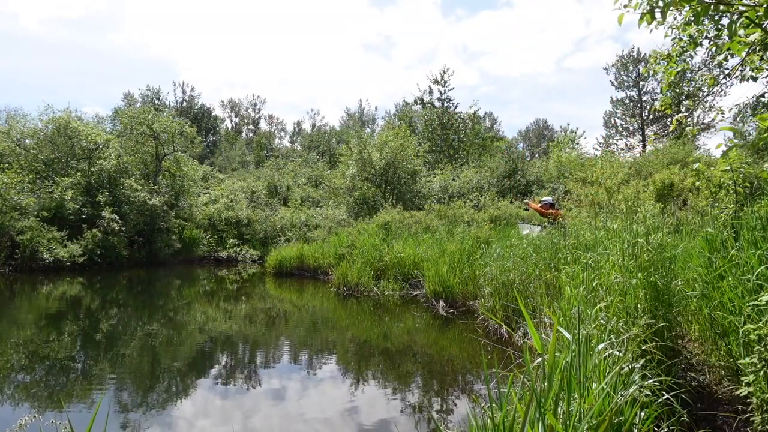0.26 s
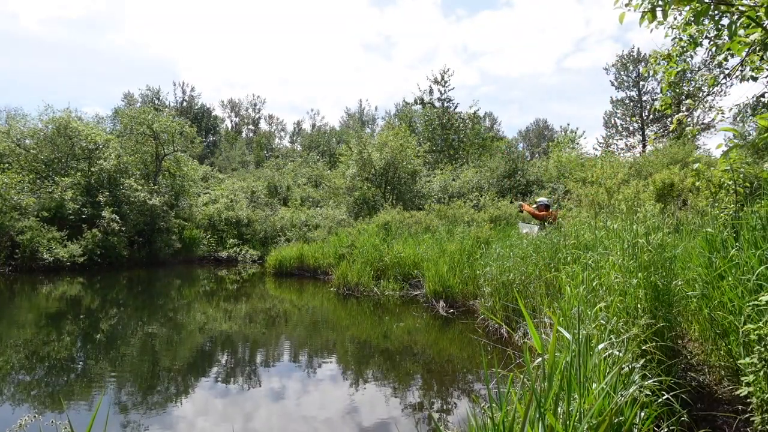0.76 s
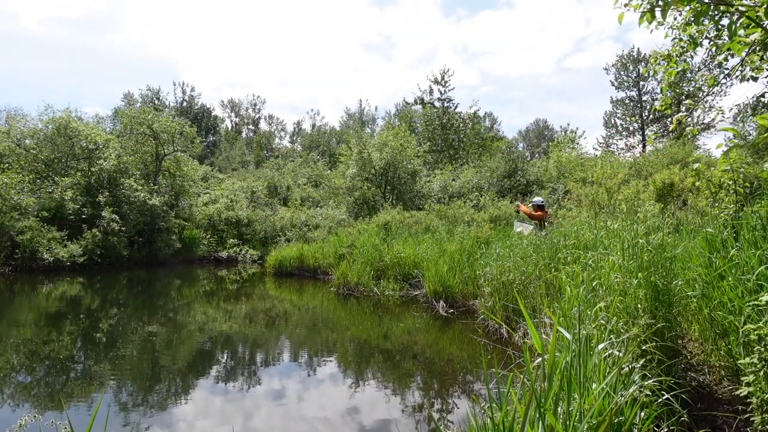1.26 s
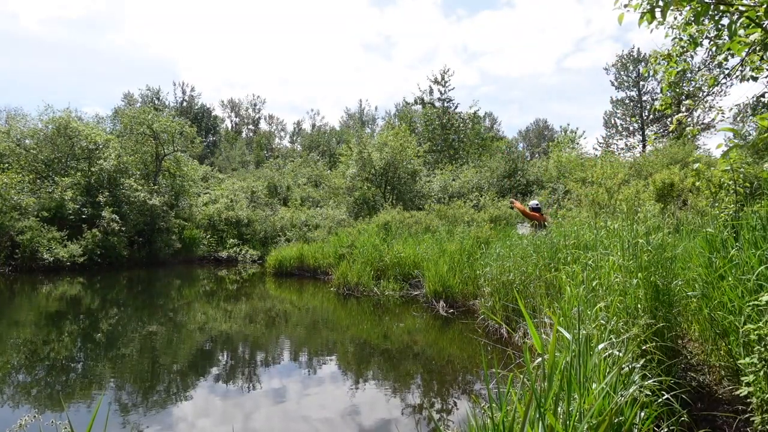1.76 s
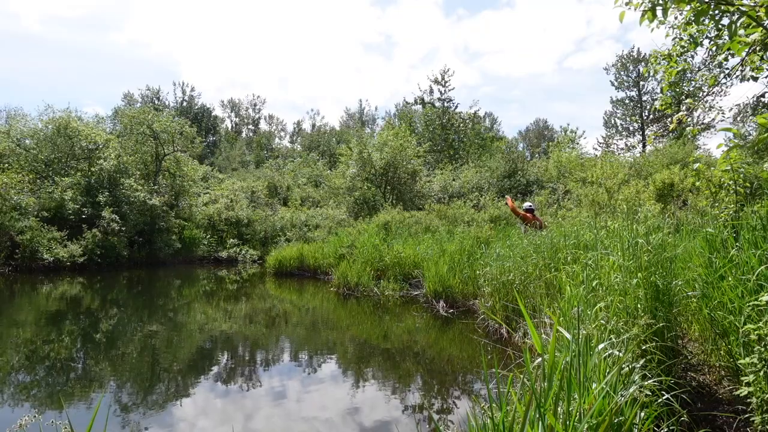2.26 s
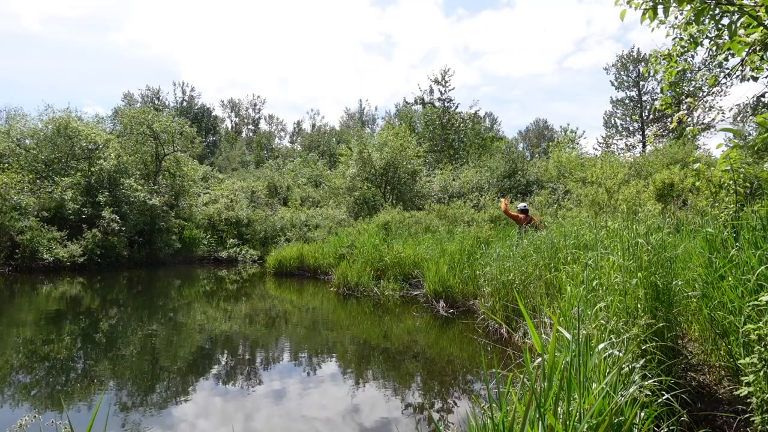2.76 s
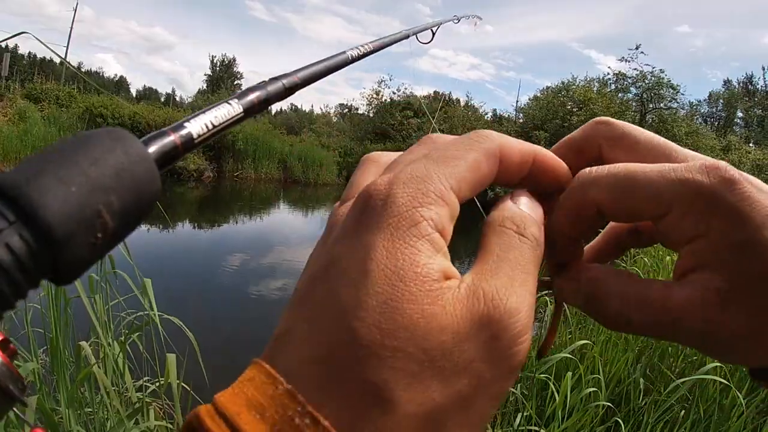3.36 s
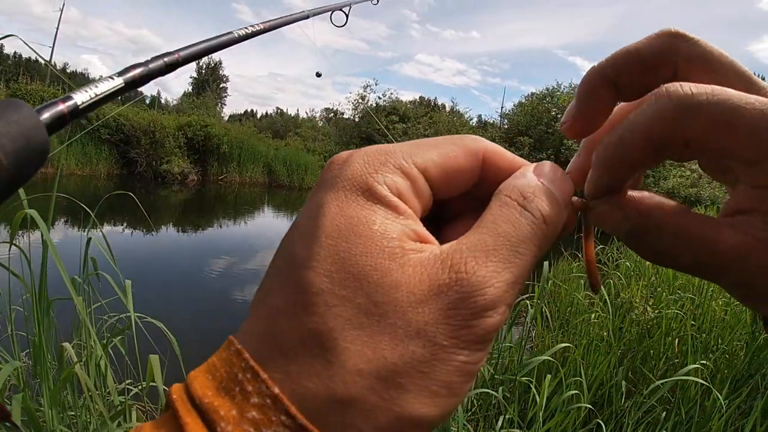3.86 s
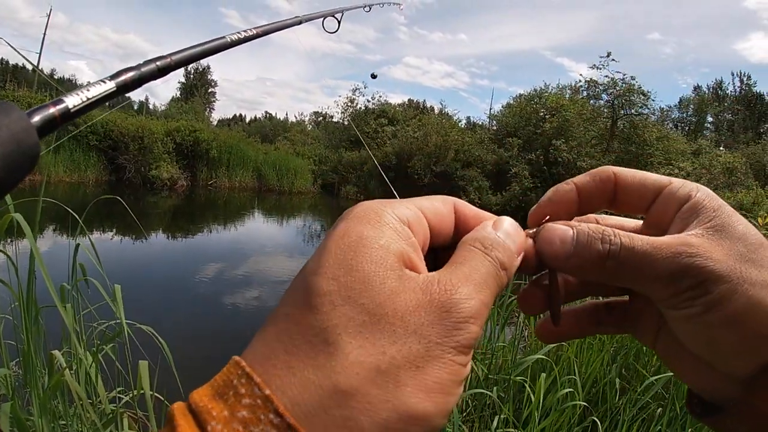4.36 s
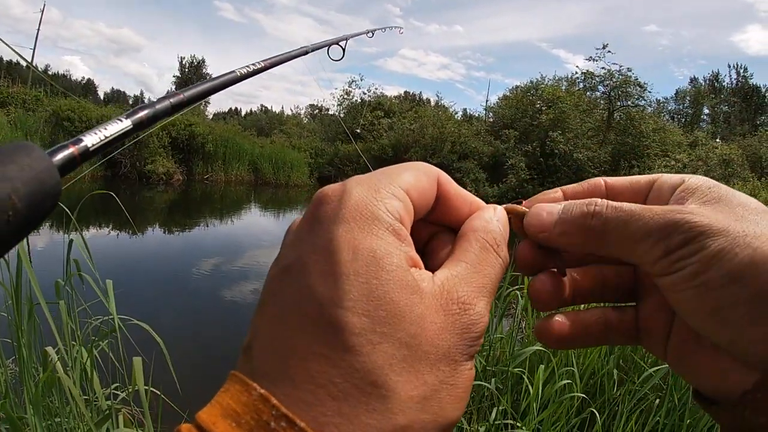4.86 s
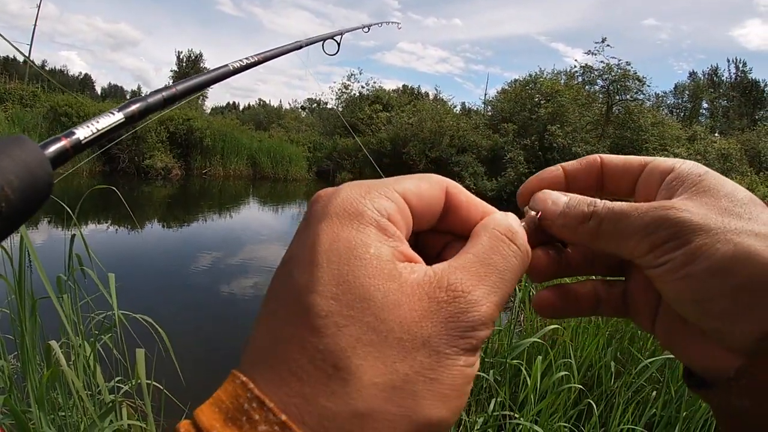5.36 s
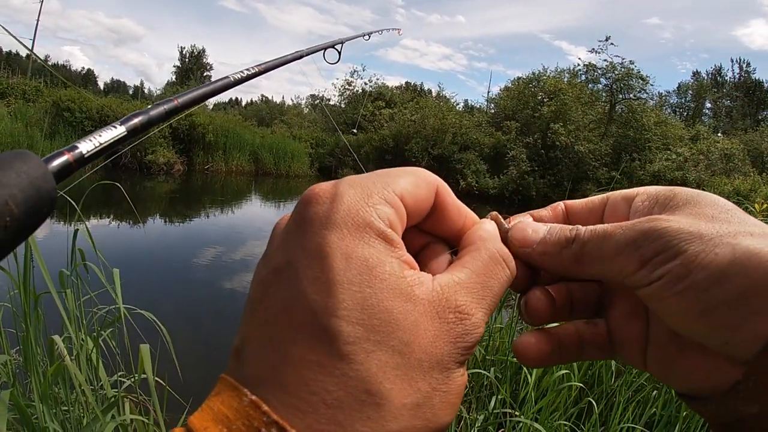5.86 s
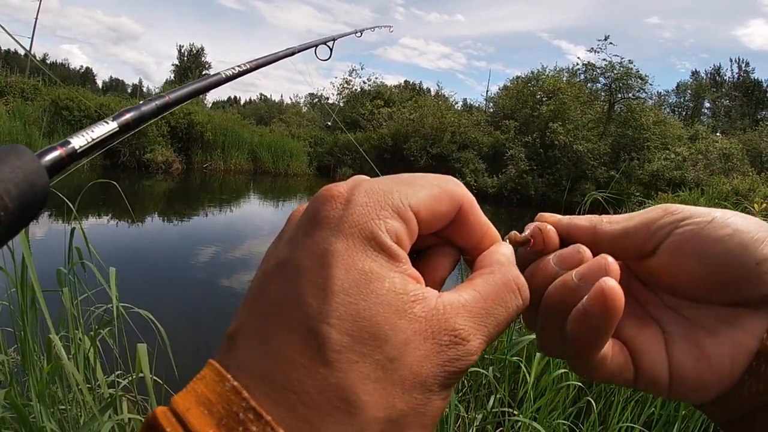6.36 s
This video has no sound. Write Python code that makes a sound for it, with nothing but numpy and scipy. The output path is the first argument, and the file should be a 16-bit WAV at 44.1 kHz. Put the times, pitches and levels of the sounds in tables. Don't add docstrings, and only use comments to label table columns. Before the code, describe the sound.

Wide stereo outdoors first: overlapping strides brush through dense grass, stalks crackle, a bird sings a short buzzy phrase, an engine hums far off and two tiny water blips pop. An abrupt cut brings a dry, close mono view by the water, with rod and line clicking in the hands, faint birds, a quick arched chirp late on, and low rumbling wind overpowering the microphone.

```python
import sys
import numpy as np
from scipy import signal
from scipy.io import wavfile
from scipy.ndimage import uniform_filter1d

SR = 44100
rng = np.random.default_rng(int(sys.argv[2]) if len(sys.argv) > 2 else 0)


def dump(signal):
    limited = np.clip(np.atleast_2d(signal).T, -1, 1)
    pcm = np.round(limited * 32767).astype(np.int16)
    wavfile.write(sys.argv[1], SR, pcm)


def attenuation_scalar(level_db):
    decades = np.asarray(level_db, float) / 20
    return 10 ** decades


N = 291942


def evened(x):
    return x / np.sqrt(np.mean(x ** 2) + 1e-20)


def steadied(x, seconds):
    return evened(x / np.sqrt(uniform_filter1d(x ** 2, size=round(seconds * SR)) + .05))


def read(points, hz):
    f, value = np.transpose(points)
    return np.interp(np.log(hz + 1), np.log(f + 1), value)


def curves(rows):
    s, *columns = np.transpose(rows)
    return [np.interp(np.arange(N) / SR, s, c) for c in columns]


def swells(rows, rise, floor_db=-120):
    t = np.arange(0, N + 64, 64) / SR
    start, length, db = np.transpose(rows)[..., None]
    u = np.clip((t - start) / length, 0, 1)
    shape = np.sin(np.pi / 2 * np.minimum(u / rise, (1 - u) / (1 - rise)))
    power = ((attenuation_scalar(db) * shape) ** 2).sum(axis=0) + attenuation_scalar(2 * floor_db)
    return np.interp(np.arange(N) / SR, t, 10 * np.log10(power))


def add(mix, s, sound):
    part = mix[..., round(s * SR):][..., :sound.shape[-1]]
    part += sound[..., :part.shape[-1]]


def panned(x, lean_db):
    return x * attenuation_scalar(np.array([[.5], [-.5]]) * lean_db)


def wander(length, hz):
    b, a = signal.butter(2, hz / (SR / 2))
    return evened(signal.lfilter(b, a, rng.standard_normal(length + 4000))[4000:])


def resonate(x, hz, width):
    return signal.lfilter(*signal.iirpeak(hz, hz / width, SR), x)


def noise(tone, patchy_db, flicker_db, size=1024, same=None, lean=((1, 0),)):
    frames, hz = 4 * N // size + 5, np.fft.rfftfreq(size, 1 / SR)
    a, b, patches = rng.standard_normal((frames, len(hz), 3)).T
    patches = evened(uniform_filter1d(uniform_filter1d(patches, size=9, axis=0), size=8, axis=1))
    flicker = evened(uniform_filter1d(rng.standard_normal(frames), size=3))
    z = (a + 1j * b)[None]
    if same:
        c, d = rng.standard_normal((frames, len(hz), 2)).T
        like = np.clip(read(same, hz), -1, 1)[:, None]
        z = np.array([z[0], like * z[0] + np.sqrt(1 - like ** 2) * (c + 1j * d)])
        z = z * attenuation_scalar(np.array([[.5], [-.5]]) * read(lean, hz))[..., None]
    z = z * attenuation_scalar(read(tone, hz)[:, None] + patchy_db * patches + flicker_db * flicker)
    return evened(signal.istft(z, nperseg=size, noverlap=size * 3 // 4)[1][:, :N])


def note(start, end, hz0, hz1, db, rough):
    length = round((end - start) * SR)
    hz = np.linspace(hz0, hz1, length) + 150 * rough * wander(length, 120)
    level = attenuation_scalar(db + 1.5 * wander(length, 12) + 6 * min(rough, .8) * wander(length, 60))
    level = level * signal.windows.tukey(length, min(1, .045 * SR / length))
    return start, np.sqrt(2) * level * np.sin(2 * np.pi * np.cumsum(hz) / SR)


def breath(start, end, hz, width, db):
    air_noise = rng.standard_normal(round((end - start) * SR))
    air_noise = resonate(resonate(air_noise, hz, width), hz, width)
    return start, attenuation_scalar(db) * evened(air_noise) * signal.windows.tukey(len(air_noise), .5)


def echoes(x, t60, wet_db):
    t = np.arange(round(.6 * SR)) / SR
    sparse = rng.standard_normal((2, len(t))) * (rng.random((2, len(t))) < .03)
    taps = sparse * attenuation_scalar(-60 * t / t60) * (t > .015)
    return attenuation_scalar(wet_db) * signal.fftconvolve(x[None], taps / np.linalg.norm(taps[0]), axes=1)[:, :N]


def air():
    # f/Hz, level/dB per Hz
    air_tone = [(24, -50), (40, -4), (76, -2.5), (129, 0), (223, -8.5), (325, -10), (484, -9.5), (590, -7),
                (796, -10.5), (972, -7), (1680, -16.5), (1910, -16.5), (3220, -20), (7890, -34),
                (15500, -43)]
    # f/Hz, likeness/1
    coherence = [(60, .99), (150, .94), (380, .55), (950, .3), (2400, .35), (6000, .3), (10500, .4),
                 (12500, .62)]
    # f/Hz, left minus right/dB
    balance = [(150, -0.5), (380, -0.5), (700, -3.5), (1290, -7.5), (2380, -0.5), (4400, -1.5),
               (8120, -5.5), (15000, 8.5)]
    return attenuation_scalar(-53.5) * noise(air_tone, 1.0, 0.41, size=2048, same=coherence, lean=balance)


def grass():
    # f/Hz, level/dB per Hz
    blade_tone = [(300, -94), (1200, -19), (2200, 3), (4000, -1), (6500, -1.5), (9000, -7.5), (12000, -21),
                  (20000, -32)]
    stem_tone = [(100, -98), (500, -9), (800, 9), (1100, 3), (1700, 1.5), (2600, -28), (8000, -83)]
    # t/s, peak level/dB, f/Hz, left minus right/dB
    snaps = [(.515, -48, 1800, -8), (.635, -58, 7200, -20), (.765, -48, 2000, -8), (.702, -56, 8300, -20),
             (1.07, -58, 6800, -18), (1.235, -57, 8500, -8), (1.985, -48, 3200, -8), (2.09, -52, 7000, -8),
             (2.33, -56, 7500, -18), (2.40, -46, 1700, -4), (2.412, -45, 1550, -6), (2.428, -46, 1750, -6),
             (2.444, -45, 1550, -6), (2.461, -49, 5200, -10), (2.473, -49, 4400, -8),
             (2.491, -46, 1700, -6), (2.495, -50, 4900, -10), (2.533, -47, 1800, -6),
             (2.615, -48, 3100, -8), (2.623, -50, 6400, -8), (2.633, -48, 2800, -8), (2.648, -47, 3300, -8),
             (2.66, -47, 3030, -6), (2.672, -44, 3000, -8), (2.676, -48, 4600, -8), (2.704, -45, 4400, -8),
             (2.723, -47, 4400, -8), (2.746, -47, 2800, -8)]
    # start t/s, length/s, swish level/dB
    strides = [
        (-.1, 0.37, -62),
        (.1, 0.48, -59.5),
        (.48, 0.31, -65),
        (1.02, 0.73, -62),
        (1.45, 0.97, -66),
        (1.82, 0.74, -62.5),
        (2.15, 1, -62),
        (2.45, 0.73, -61),
        (3.0, 1, -60.5),
    ]
    swish_db = swells(strides, rise=0.18, floor_db=-80)
    stems_db = -56.5 - 2.5 * np.arange(N) / SR + 0.27 * (swish_db - swish_db[:3 * SR].mean())
    grains_per_s = 1500
    grains = attenuation_scalar(3.0 * np.minimum(rng.exponential(1, N), 5)) * (rng.random(N) < grains_per_s / SR)
    grains = signal.lfilter([1], [1, -.97], grains)
    blades = noise(blade_tone, 1.47, 0.55, size=256, same=[(1, 0.63)])
    blades = blades * evened(1 + 0.1 * evened(grains))
    stems = noise(stem_tone, 3.36, 0.6, size=512, same=[(1, 0.67)])
    out = panned(blades * attenuation_scalar(swish_db - 2.5), -9.0) + panned(stems * attenuation_scalar(stems_db), -4.5)
    t = np.arange(800) / SR
    for s, db, hz, lean_db in snaps:
        burst = rng.standard_normal(800) * attenuation_scalar(2 - 60 * t / .028)
        snap = resonate(resonate(burst, hz, .3 * hz), hz, .3 * hz)
        add(out, s, panned(attenuation_scalar(db) * np.sqrt(9000 / hz) * snap, lean_db))
    return out


def engine():
    # multiple of firing rate/1, level/dB
    orders = [(1, -1), (1.5, -10), (2, 0), (3, 3.5), (4, -15)]
    cylinders_db = [1.5, -6.5, -9, -7]
    # start t/s, length/s, exhaust level/dB
    revs = [
        (-.05, 0.31, -50.5),
        (.35, 0.62, -55.5),
        (1.03, 1, -56),
        (1.4, 0.29, -51),
        (1.885, 0.67, -53),
        (2.35, 1, -55.5),
        (3.2, 0.61, -54),
    ]
    # t/s, peak level/dB, pipe f/Hz
    firings = [(1.902, -49, 575), (1.916, -45.5, 617), (1.93, -48, 610), (1.945, -49, 610),
               (1.957, -48, 645), (1.97, -43.5, 605), (1.997, -49, 600), (2.011, -39, 618),
               (2.026, -41.5, 640), (2.04, -53, 614), (2.059, -47, 545), (2.077, -44, 640),
               (2.093, -44.5, 615), (2.107, -47, 630), (2.121, -45, 614), (2.134, -38.5, 602),
               (2.148, -45, 677), (2.162, -51, 570), (2.175, -48, 624), (2.188, -44.5, 622),
               (2.202, -49, 616), (2.215, -51, 600), (2.228, -47, 600), (2.243, -43.5, 614),
               (2.253, -45, 630), (2.272, -48, 590), (2.284, -52, 620), (2.296, -50, 635),
               (2.306, -47, 610), (2.323, -53, 580), (2.351, -50, 620)]
    firing_hz, strong_firing_s, exhaust_order, firing_s = 73.6, 2.129, 8.25, 0.018
    t, bark_db = np.arange(N) / SR, swells(revs, rise=0.2, floor_db=-85)
    drone_db = -55 - 2.5 * t - 4.5 * np.clip((t - 1.86) / 0.037, 0, 1)
    turns = np.cumsum(firing_hz * (1 + .005 * wander(N, 4))) / SR
    turns -= turns[round(strong_firing_s * SR)]
    drone = sum(attenuation_scalar(db + 3.35 * wander(N, 33.0)) * np.cos(2 * np.pi * k * turns) for k, db in orders)

    fired = np.flatnonzero(np.diff(np.floor(turns)))
    number = np.round(turns[fired]).astype(int)
    pulses = np.zeros(N)
    pulses[fired] = attenuation_scalar(np.take(cylinders_db, number % 4) + 1.8 * rng.standard_normal(len(fired)))
    throb = signal.oaconvolve(pulses, np.hanning(720))[:N]
    tone = evened(throb * np.cos(2 * np.pi * exhaust_order * turns))
    pipe_noise = resonate(resonate(rng.standard_normal(N), 640, 150), 640, 150)
    bark = (tone + .5 * evened(throb * pipe_noise)) * attenuation_scalar(bark_db - 10.0)
    u = np.arange(round(firing_s * SR)) / SR
    puff = np.sin(np.pi * (u / firing_s) ** 0.6) ** 2
    for s, db, hz in firings:
        add(bark, s - .003, attenuation_scalar(db - 3.0) * puff * np.sin(2 * np.pi * hz * u))
    return drone * attenuation_scalar(drone_db - 3.5) + panned(bark, 6.5)


def trill():
    # t/s, pitch shift/Hz, effort level/dB, second voice/0-1, break-up/0-1
    course = [(.58, 14, -25, 0, 0), (.6, 0, -3, 0, 0), (.66, -6, 0, 0, 0), (.715, -12, 0, 0, 0),
              (.74, -2, 0, 1, 0), (.775, 8, -1, 1, 0), (.82, 0, -.5, 1, 0), (.865, -32, -.5, 1, .1),
              (.88, -36, 1, 1.5, 1), (.922, -34, -1, 1.5, 1), (.945, -30, -20, 1.5, 1)]
    # f/Hz, level/dB, roughness/0-1, second voice's gain/dB,
    # left minus right/dB, right channel lag/rad
    flutter_lines = [(3044, -64.5, .1, 2.5, 11, 1.7), (3180, -67, .18, -1, 4, 0),
                     (3325, -51, .045, -1.5, 3, .2), (3480, -74, .9, 0, 3, 0),
                     (3630, -65.5, .11, 4.5, 8, .5), (3920, -57, .045, 0, 12, 1.5),
                     (4205, -78, .3, 0, 10, 0)]
    breaks_per_s = 64
    shift_hz, effort_db, second, broken = np.array(curves(course))[:, :SR]
    t, out = np.arange(SR) / SR, np.zeros((2, N))
    sounding = (t > course[0][0]) * (t < course[-1][0])
    for k, (hz, db, rough, second_db, lean_db, lag) in enumerate(flutter_lines):
        shaken_hz = hz + shift_hz + 150 * (rough + .25 * broken) * wander(SR, 120)
        chop_phase = 2 * np.pi * breaks_per_s * t + 2.2 * k + 1.2 * wander(SR, 30)
        chop = 1 - .47 * broken * (1 + np.cos(chop_phase))
        shake_db = (.7 + 7 * min(rough, .5)) * wander(SR, 50)
        level = attenuation_scalar(db + effort_db + second_db * second + shake_db) * chop
        line = np.sin(2 * np.pi * np.cumsum(shaken_hz) / SR - np.array([[0], [lag]]))
        add(out, 0, panned(sounding * np.sqrt(2) * level * line, lean_db))
    return out


def marsh_bird():
    # start t/s, length/s, f/Hz, level/dB, roughness/0-1
    notes_sung = [(.26, .028, 3520, -62, .4), (.325, .115, 2320, -58.5, .1), (.436, .022, 2260, -66, .7),
                  (.443, .04, 2100, -60, .3), (.452, .032, 5950, -72, .2), (.491, .047, 3382, -53, .15),
                  (.528, .03, 3380, -69, .4), (.53, .025, 2650, -66, .4), (.556, .04, 5378, -59, .1),
                  (.558, .052, 5682, -63.5, .1), (.84, .06, 4200, -72, .3), (.945, .062, 2678, -62.5, .1),
                  (1.075, .04, 2680, -68, .2)]
    # start t/s, end t/s, f/Hz, width/Hz, level/dB
    buzz = [
        (.557, .586, 5150, 650, -58),
        (.58, .612, 5300, 900, -64),
    ]
    song, lines = np.zeros(N), trill()
    for start, length, hz, db, rough in notes_sung:
        add(song, *note(start, start + length, hz, hz, db, rough))
    for row in buzz:
        add(song, *breath(*row))
    return attenuation_scalar(1.5) * (panned(song, 6) + lines + echoes(1.2 * song + .75 * lines[0], 1.6, -11.5))


def drips():
    # start t/s, length/s, start f/Hz, end f/Hz, peak level/dB
    bubbles = [
        (1.341, .015, 1300, 4700, -51),
        (1.536, .009, 1550, 3100, -48.5),
    ]
    out = np.zeros(N)
    for s, length, hz0, hz1, db in bubbles:
        u = np.linspace(0, 1, round(length * SR))
        hz = hz0 * (hz1 / hz0) ** u ** 1.3
        add(out, s, attenuation_scalar(db) * np.sin(np.pi * u ** .7) * np.sin(2 * np.pi * np.cumsum(hz) / SR))
    return panned(out, -5.0)


def rod():
    # t/s, peak level/dB, loudest ring f/Hz, t60/s
    clicks = [(3.322, -40, 4600, 0.018), (3.3229, -39.5, 3720, 0.027), (3.324, -42, 3000, 0.045),
              (3.328, -46, 1993, 0.087), (3.3323, -39.5, 2860, 0.03), (3.3326, -41, 4110, 0.025),
              (3.337, -55, 3030, 0.018), (3.3375, -44, 4270, 0.031), (3.341, -44, 3000, 0.04),
              (3.347, -53, 6300, .02), (3.35, -49, 1450, 0.057), (3.365, -48, 4200, .025),
              (3.369, -53, 4430, 0.047), (3.384, -56, 2100, 0.035), (3.393, -55, 4400, .02),
              (3.397, -62, 4380, .02), (3.554, -64, 3100, .015), (3.557, -63, 2220, 0.11),
              (3.566, -52, 5000, 0.01), (3.5665, -39.5, 3940, 0.017), (3.5668, -36.5, 3000, 0.011),
              (3.5675, -42.5, 2117, 0.12), (3.574, -59, 1800, 0.026), (3.577, -52, 1880, 0.1),
              (3.582, -54, 4500, 0.025), (3.590, -54, 4400, 0.033), (3.5953, -42, 4300, 0.018),
              (3.596, -49, 7200, .025), (3.6, -54, 4080, 0.02), (3.599, -46, 1018, 0.11),
              (3.612, -59, 4460, 0.016), (3.613, -50, 2170, .03), (3.62, -57, 1930, 0.11),
              (3.923, -47, 4600, 0.016), (4.29, -65, 5870, 0.025), (4.5746, -49, 4600, 0.018),
              (4.574, -51, 3140, 0.018), (4.576, -53, 1700, 0.058), (4.623, -59, 4440, 0.07),
              (4.631, -47, 4500, 0.025), (4.6358, -38.5, 4760, 0.029), (4.639, -46, 3000, 0.024),
              (4.648, -52, 4600, 0.067), (4.65, -50.5, 2360, 0.078), (5.345, -66, 3800, 0.031)]
    # f/Hz, width/Hz, level/dB
    modes = [(331, 33, 0.5), (1045, 140, -4), (1700, 60, -9), (2100, 420, -2.5), (3000, 410, -1),
             (3800, 570, 0), (4600, 110, -12.5), (5600, 190, -7), (6400, 250, -2.5), (6850, 170, -16.5)]
    # t/s, peak level/dB, f/Hz, t60/s
    booms = [
        (3.605, -47, 129, 0.16),
        (4.647, -43.5, 190, 0.073),
    ]
    out, ticks, t = np.zeros(N), np.zeros(N), np.arange(3000) / SR
    rise = 1 - np.exp(-t / 0.00041)
    for s, db, struck_hz, t60 in clicks:
        luck, burst = rng.standard_normal(len(modes)), rng.standard_normal(3001)
        bright_db = -2.5 - 200 * t60
        thud_db = -2.5 - 2.5 * np.log2(struck_hz / 3000)
        rattle = burst[1:] * attenuation_scalar(-60 * t / (0.38 * t60 + 0.0057)) * rise
        ring = np.zeros(3000)
        for (hz, width, mode_db), chance in zip(modes, luck):
            tilt_db = bright_db if hz > 5000 else thud_db if hz < 1300 else 0
            gain = attenuation_scalar(mode_db + 2.1 * chance + tilt_db) * np.sqrt(400 / width)
            ring += gain * resonate(resonate(rattle, hz, width), hz, 2 * width)
        uneven = uniform_filter1d(burst[:0:-1], size=40)
        struck = np.sin(2 * np.pi * struck_hz * t + 2.5 * uneven)
        struck = rise * attenuation_scalar(-60 * t / (.75 * t60)) * struck
        add(out, s, attenuation_scalar(db) * (3.28 * ring + 0.82 * struck))
        add(ticks, s, attenuation_scalar(db) * attenuation_scalar(-28 - 60 * t / .006) * np.diff(burst))
    for s, db, hz, t60 in booms:
        add(out, s, attenuation_scalar(db - 60 * t / t60) * np.sin(2 * np.pi * hz * t))
    out = signal.sosfilt(signal.butter(6, 8500, fs=SR, output="sos"), out)
    return out + signal.sosfilt(signal.butter(6, 10000, fs=SR, output="sos"), ticks)


def wind():
    # f/Hz, level/dB per Hz
    buffet_tone = [(8, -55), (24, -19), (42, -15), (52, 0), (60, -16), (85, -13), (115, -21), (600, -110)]
    body_tone = [(30, -69), (70, -23.5), (120, -7), (160, -3.5), (220, 1.5), (300, -7), (450, -12.5),
                 (1500, -100)]
    roar_tone = [(80, -79.5), (250, -4), (400, 0), (700, -1.5), (1200, -13), (2500, -21.5), (7000, -92.5)]
    # t/s, strength level/dB, extra turbulence/dB
    gust = [(3.33, -65, -1), (3.5, -66.5, -0.5), (3.72, -62, 2), (4.02, -58.5, -1.5), (4.12, -45, -3),
            (4.41, -48.5, 3.5), (4.52, -55.5, 4.5), (4.72, -49, 3), (4.9, -38.5, 0.5), (5.1, -42, 1.5),
            (5.3, -41.5, 2.5), (5.5, -38.5, -2.5), (5.6, -44.5, 5.5), (5.8, -39.5, 0), (6.0, -37.5, -5),
            (6.25, -42.5, 3), (6.47, -35, -1.5), (6.62, -45, -5)]
    # start t/s, length/s, roar level/dB
    flurries = [
        (4.03, 0.75, -66),
        (4.7, 0.2, -72),
        (5.2, 0.49, -59.5),
        (5.6, 0.27, -64.5),
        (5.86, .1, -58),
        (6.05, 0.22, -66.5),
        (6.24, 0.26, -62),
        (6.46, 0.63, -63.5),
    ]
    # start t/s, length/s, level/dB
    jolts = [
        (3.322, 0.068, -58.5),
        (3.566, 0.05, -56),
        (6.368, 0.022, -65),
    ]
    # start t/s, length/s, level/dB
    thumps = [
        (6.362, .04, -56),
    ]
    # t/s, level/dB, half width/s
    pushes = [
        (4.65, -44, .003),
        (6.377, -30, .0036),
        (6.5115, -34, .002),
    ]
    gust_db, turbulence_db = curves(gust)
    change_db = gust_db + 45
    flurry, jolt = attenuation_scalar(swells(flurries, 0.17)), attenuation_scalar(swells(jolts, 0.059))
    eddies_db = 1.3 * wander(N, 25)
    buffet = steadied(noise(buffet_tone, .8, .5, size=4096)[0], .17) * attenuation_scalar(gust_db + eddies_db)

    body_level = attenuation_scalar(-55.5 + 0.48 * change_db + turbulence_db)
    body_level += .5 * attenuation_scalar(-0.5) * flurry + attenuation_scalar(-15.5) * jolt + attenuation_scalar(swells(thumps, 0.2))
    body = noise(body_tone, 1.4, 1.1, size=2048)[0] * body_level * attenuation_scalar(0.11 * eddies_db)
    roar_level = np.sqrt(attenuation_scalar(-68 + 0.36 * change_db) ** 2 + flurry ** 2 + jolt ** 2)
    roar = noise(roar_tone, 0.86, 0.21, size=512)[0] * roar_level

    t, dents = np.arange(N) / SR, np.zeros(N)
    for s, db, width in pushes:
        u = (t - s) / width
        dents += attenuation_scalar(db) * (u ** 2 - 1) * np.exp(-u ** 2 / 2)
    return dents + buffet + body + roar


def reeds():
    # f/Hz, level/dB per Hz
    rustle_tone = [(400, -46), (900, -4.5), (1500, -1.5), (2300, -7.5), (3300, -11), (5000, -24),
                   (9000, -81)]
    hiss_tone = [(1500, -47.5), (3000, -3.5), (4200, -2.5), (5200, -5), (6100, -7.5), (7000, -14),
                 (9000, -19.5), (11000, -32.5), (16000, -33.5)]
    # t/s, level/dB
    breeze = [
        (3.33, -59.5),
        (3.4, -78),
        (3.92, -76),
        (4.35, -71),
        (5.17, -74.5),
        (5.4, -70.5),
        (5.63, -72.5),
        (6.03, -79),
        (6.62, -72.5),
    ]
    # start t/s, length/s, level/dB
    shivers = [
        (3.33, 0.63, -83.5),
        (4.2, 0.35, -82.5),
        (6.05, 2.3, -77.5),
    ]
    breeze_db, = curves(breeze)
    steady_hiss = attenuation_scalar(-84 + 0.32 * (breeze_db - breeze_db.mean()))
    hiss_level = np.hypot(steady_hiss, attenuation_scalar(swells(shivers, 0.39)))
    rustle = attenuation_scalar(breeze_db) * noise(rustle_tone, 1.8, 1.0, size=512)[0]
    return rustle + hiss_level * noise(hiss_tone, 2.9, 0.84, size=512)[0]


def sigh(start, length, db, rough):
    catches = [4.853, 5.068, 5.335, 5.475, 5.592, 5.645, 5.718]
    t = np.arange(round(length * SR)) / SR
    hz = 4028 + 330 * np.exp(-t / .115) + 150 * rough * wander(len(t), 120)
    shape = np.minimum(.3 + .7 * t / (.36 * length), 1.2 - (t / length) ** 1.1)
    shape *= signal.windows.tukey(len(t), .06)
    shape *= 1 - .85 * sum(np.exp(-((start + t - s) / .013) ** 2) for s in catches)
    level = np.sqrt(2) * attenuation_scalar(db + 1.2 * wander(len(t), 25)) * shape
    return start, level * np.sin(2 * np.pi * np.cumsum(hz) / SR)


def far_birds():
    # start t/s, length/s, start f/Hz, end f/Hz, level/dB
    clear = [
        (3.77, .05, 2800, 2800, -86),
        (3.85, .07, 3400, 3400, -86),
        (4.0, .14, 3550, 3540, -90),
        (5.69, .05, 3950, 3750, -88),
        (5.71, .12, 3790, 3570, -87),
        (6.2, .42, 4600, 4620, -93),
        (6.3, .32, 3950, 3900, -91),
    ]
    hazy = [
        (5.33, .06, 3850, 3720, -87),
        (4.08, .17, 5900, 6000, -93),
        (4.68, .82, 6050, 5950, -96),
        (4.1, .3, 2200, 2150, -85),
    ]
    # start t/s, length/s, level/dB, roughness/0-1
    sighs = [
        (4.68, .6, -78, .14),
        (5.285, .62, -79, .24),
    ]
    # start t/s, end t/s, f/Hz, width/Hz, level/dB
    haze = (5.33, 5.58, 4200, 450, -80.5)
    # t/s, f/Hz, level/dB
    arch = [
        (6.04, 2200, -72),
        (6.047, 2650, -64),
        (6.054, 3150, -55),
        (6.057, 3900, -63),
        (6.0615, 4450, -55),
        (6.066, 4720, -67),
        (6.072, 4950, -64),
        (6.078, 4500, -60),
        (6.082, 3200, -60),
        (6.088, 2350, -69),
    ]
    overtone = [
        (6.032, 3700, -80),
        (6.04, 4450, -70),
        (6.052, 5750, -84),
    ]
    out, chirp, t = np.zeros(N), np.zeros(N), np.arange(N) / SR
    for rows, rough in ((clear, .2), (hazy, 1.1)):
        for start, length, hz0, hz1, db in rows:
            add(out, *note(start, start + length, hz0, hz1, db, rough))
    for row in sighs:
        add(out, *sigh(*row))
    add(out, *breath(*haze))
    for rows in (arch, overtone):
        hz, db = curves(rows)
        hz = hz + 100 * wander(N, 300)
        sounding = (t > rows[0][0]) * (t < rows[-1][0])
        chirp += attenuation_scalar(db + 2.6 * wander(N, 200)) * np.sin(2 * np.pi * np.cumsum(hz) / SR) * sounding
    chirp += attenuation_scalar(-16) * resonate(np.roll(chirp, round(.048 * SR)), 4300, 2500)
    return out + echoes(out, .4, -9)[0] + chirp + echoes(chirp, .25, -7.5)[0]


def scene():
    cut_s, resume_s = 3.277, 3.3215
    t = np.arange(N) / SR
    wide = air() + grass() + engine() + marsh_bird() + drips()
    wide = signal.sosfilt(signal.butter(10, 63, "high", fs=SR, output="sos"), wide)
    close = wind() + reeds() + far_birds()
    fade_out = np.clip((cut_s - t) / .009, 0, 1) + attenuation_scalar(-28) * (t < cut_s + .009)
    fade_in = np.clip((t - resume_s) / 0.0048, 0, 1) + attenuation_scalar(-37.5) * (t > resume_s - .013)
    return wide * fade_out + close * fade_in + rod()


def top_cut(x):
    return signal.sosfilt(signal.butter(12, 15650, fs=SR, output="sos"), x)


def record(dry):
    return top_cut(dry)


dry = scene()
out = record(dry)
dump(out)
```